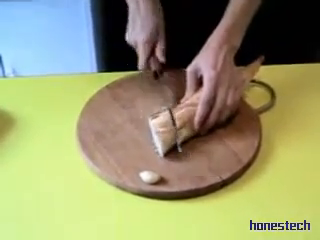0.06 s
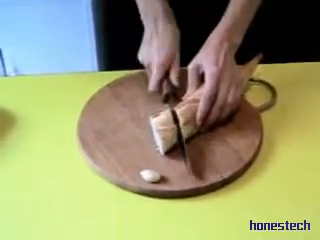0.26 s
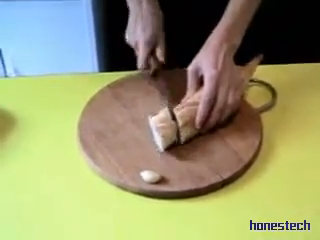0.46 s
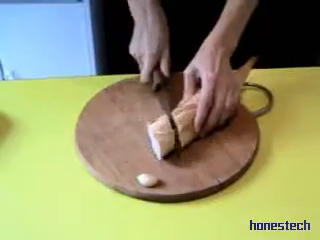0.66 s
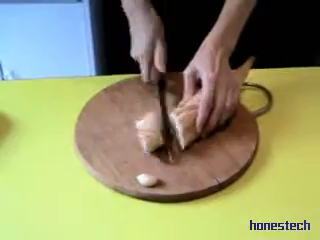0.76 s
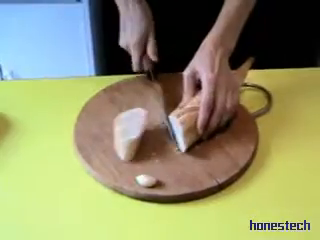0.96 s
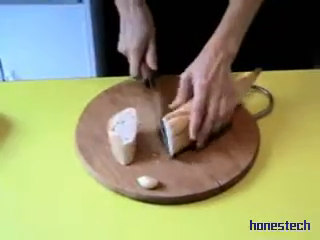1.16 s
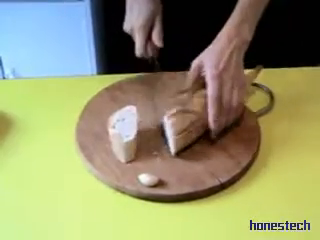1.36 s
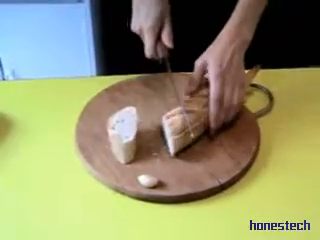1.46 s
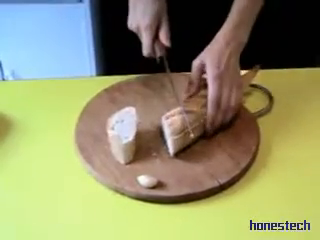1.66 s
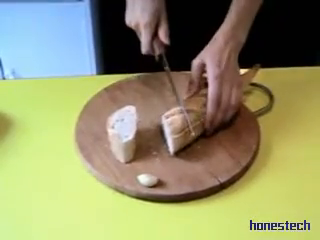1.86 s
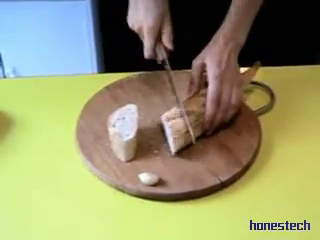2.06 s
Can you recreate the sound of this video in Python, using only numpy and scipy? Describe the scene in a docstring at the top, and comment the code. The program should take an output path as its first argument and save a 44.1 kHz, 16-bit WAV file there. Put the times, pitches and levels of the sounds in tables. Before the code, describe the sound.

Crunchy bread cutting in an echoing kitchen, a hard board knock, then a pause and light scraping

```python
"""In a bare, ringing kitchen, a knife saws through a crusty loaf on a round wooden board.
Streams of tiny clicks make the crunch of the strokes, and short bright bursts are single snaps of crust.
Low bursts thud under the hands; the blade breaks through and knocks on the wood, which rings as damped tones.
After a quieter pause with a thin squeak and light taps, the blade scrapes on the loaf and bites again.
Noise filtered to a low, steady murmur fills the room, and each contact gets its own random echo."""
import sys
import numpy as np
from scipy import signal
from scipy.fft import rfft, irfft, next_fast_len
from scipy.io import wavfile

SR = 44100
rng = np.random.default_rng(int(sys.argv[2]) if len(sys.argv) > 2 else 0)


def unload_audio(sound):
    """Save the sound as a 16-bit wav file, at the path given as the first command line argument."""
    columns = np.transpose(np.atleast_2d(sound))
    # keep every value between -1 and 1, then stretch to whole-number steps
    steps = np.round(np.clip(columns, -1, 1) * 32767)
    wavfile.write(sys.argv[1], SR, steps.astype(np.int16))


N = 92610  # length in samples, 2.1 s

TOP_HZ = 11200  # the sound has little above this
SNAP_DECAY_S = 0.014
CRUNCH_WET_DB = 1  # echo over direct sound for strokes, squeak and scrape
STROKE_RISE_S = 0.0027


def amp(db):
    """Turn decibels into an amplitude factor."""
    return 10 ** (np.asarray(db) / 20)


def unit(x):
    """Scale x to an average power of one."""
    return x / np.sqrt(np.mean(x ** 2) + 1e-20)


def along(points, hz):
    """Read a curve of (f/Hz, value) points, joined by lines on a log frequency axis."""
    f, v = np.transpose(points)
    return np.interp(np.log(hz + 1), np.log(f + 1), v)


def fade(t, t60):
    """Die away by 60 dB in t60 seconds."""
    return amp(-60 * t / np.maximum(t60, 1e-3))


def add(track, s, x):
    """Mix x into the track from time s, which may lie before the start."""
    i = round(s * SR)
    x, i = x[max(0, -i):], max(0, i)
    track[i:i + len(x)] += x[:max(0, N - i)]


def coloured(x, points, tilt_db=0):
    """Filter x to a colour curve; tilt_db per octave brightens or dulls it between 300 and 6000 Hz."""
    size = 8192
    hz = np.fft.rfftfreq(size, 1 / SR)
    tilt = tilt_db * np.log2(np.clip(hz, 300, 6000))
    top_cut = 60 * np.clip(hz / TOP_HZ - 1, 0, 1)
    gain = unit(amp(along(points, hz) + tilt - top_cut))
    # folding the cepstrum forward makes the filter answer at once, with no sound ahead of the hit
    cepstrum = irfft(np.log(gain + 1e-6))
    cepstrum[1:size // 2] *= 2
    cepstrum[size // 2 + 1:] = 0
    response = irfft(np.exp(rfft(cepstrum)))
    return signal.fftconvolve(x, response)[:len(x)]


def burst(decay_s):
    """A brief contact: fading noise of unit energy with a nearly even spectrum."""
    t = np.arange(4096) / SR
    x = rng.standard_normal(len(t))
    # evening out the spectrum smears the fade, so the two steps take turns
    for _ in range(3):
        even = irfft(np.exp(1j * np.angle(rfft(x))))
        x = even * fade(t, 2 * decay_s)
    return x / np.linalg.norm(x)


def ring(modes):
    """One second of damped tones from (f/Hz, level/dB, t60/s); each level sets the tone's energy."""
    t = np.arange(SR) / SR
    out = np.zeros(SR)
    for hz, db, t60 in modes:
        wave = np.sin(2 * np.pi * hz * t) * fade(t, t60)
        out += amp(db) * wave / np.linalg.norm(wave)
    return out


def kitchen(x, wet_db):
    """Direct sound, dense early reflections and a long, grainy tail, new for every sound."""
    # how long the echo lasts at each pitch: f/Hz, t60/s
    echo_times = [(120, 0.8), (300, 0.36), (600, 0.78), (1200, 0.74), (2500, 0.77), (5000, 0.75),
                  (11000, 0.73)]
    early_t60, early_db = 0.079, -4  # s; dB over the tail
    wall_delay_s = 0.0061  # the echo swells in over about this time
    clumps_per_s, clump_db = 220, 2.5  # reflections arrive in clumps
    t = np.arange(SR) / SR
    hz, s, bands = signal.stft(rng.standard_normal(SR), SR, nperseg=256)
    faded_bands = bands * fade(s, along(echo_times, hz)[:, None])
    tail = signal.istft(faded_bands, SR, nperseg=256)[1][:SR]
    early = rng.standard_normal(SR) * fade(t, early_t60)
    echo = unit(tail) + amp(early_db) * unit(early)
    knots = rng.standard_normal(size=1000)
    clumps = amp(clump_db * np.interp(t * clumps_per_s, np.arange(len(knots)), knots))
    echo = echo * clumps * (1 - np.exp(-(t / wall_delay_s) ** 2))
    direct = t == 0
    response = amp(wet_db) * echo / np.linalg.norm(echo) + direct
    return signal.fftconvolve(x, response / np.linalg.norm(response))[:SR]


def crumbs():
    """One second of tiny fractures at random times, mostly small and a few large."""
    per_s, spread_db = 600, 3.5
    hit = rng.random(SR) < per_s / SR
    sign = rng.choice([-1, 1], SR)
    size = amp(spread_db * np.minimum(rng.exponential(size=SR), 4))
    return unit(hit * sign * size)


def sawing():
    """Each stroke tears a stream of crumbs, with a quick start and a softer end."""
    # sawing strokes: start t/s, length/s, level before the common lift/dB, brightness/dB per octave
    strokes = [(-.1, 0.25, -44.5, 2), (.225, 0.05, -28.5, -1), (.38, 0.21, -43.5, -.5),
               (0.608, 0.032, -37, -1), (.66, 0.049, -57, -12), (1.0, 0.049, -41, 3),
               (1.14, 0.041, -42.5, 1.5), (1.23, 0.21, -53, 0), (1.94, 0.26, -65, 7),
               (2.065, 0.096, -41, 6.5)]
    # colour of the tearing crust: f/Hz, relative level/dB
    crunch_colour = [(60, -21), (200, -2), (500, 6.5), (1100, 4.5), (1600, 0.5), (2300, -3.5), (3000, -7),
                     (4500, -15.5), (5200, -33), (5800, -23), (8000, -33), (10800, -25.5)]
    lift_db, fall_s = 1.5, 0.042
    out, t = np.zeros(N), np.arange(SR) / SR
    rise = np.minimum(t / STROKE_RISE_S, 1)
    for s, length, db, tilt in strokes:
        push = rise * np.exp(-np.maximum(t - length, 0) / fall_s)
        crunch = kitchen(push * crumbs(), CRUNCH_WET_DB)
        add(out, s, amp(db + lift_db) * coloured(crunch, crunch_colour, tilt))
    return out


def air():
    """The low, steady noise of the room: random noise shaped by frequency."""
    # colour of the room noise: f/Hz, relative level/dB per Hz
    air_colour = [(25, -37), (60, -24), (90, -14.5), (116, -4), (136, -18), (162, 0), (200, -11.5),
                  (280, -6.5), (400, -9), (700, -15), (1000, -24), (2000, -33.5), (4000, -46), (7000, -56),
                  (11000, -55)]
    level_db = -46
    hz = np.fft.rfftfreq(N, 1 / SR)
    spectrum = rfft(rng.standard_normal(N)) * amp(along(air_colour, hz))
    return amp(level_db) * unit(irfft(spectrum, N))


def thuds():
    """The board bumps on the table under the hands, a soft burst that sets the room's low tones ringing."""
    # bumps: t/s, level before the common lift/dB
    bumps = [(.125, -15.5), (0.241, -10), (0.28, -10.5), (.482, -13.5), (0.5408, -5), (.581, -7),
             (.605, -11), (.791, -8.5), (0.831, -9), (1.01, -16.5), (1.06, -20), (1.15, -15),
             (1.478, -24.5), (1.811, -28)]
    # colour of a bump: f/Hz, relative level/dB
    bump_colour = [(30, -38), (60, -33.5), (110, -20), (160, 0), (300, -2), (450, -9), (800, -15),
                   (1500, -53), (4000, -51.5)]
    # ringing low tones of the room, before colouring: f/Hz, level/dB, t60/s
    room_modes = [(123.7, -21, 0.2), (162.1, -19.5, 0.48), (200.8, -31.5, .6), (285.5, -18, 0.54),
                  (383.6, -19, 0.39)]
    lift_db, decay_s, wet_db = 7.5, 0.032, 3
    out, room_ring = np.zeros(N), ring(room_modes)
    for s, db in bumps:
        bump = kitchen(burst(decay_s), wet_db) + room_ring
        add(out, s, amp(db + lift_db) * coloured(bump, bump_colour))
    return out


def crust():
    """Single flakes of crust break with a bright click, a very short burst of noise."""
    # snaps: t/s, level before the common lift/dB, brightness/dB per octave, echo over direct sound/dB
    snaps = [(.212, -20.5, -2, 11), (0.2163, -19.5, 1, 8), (0.2257, -22, 1.5, 2), (0.233, -16, -0.5, 1),
             (.236, -18, 2.5, 5), (.251, -15.5, -5.5, -6), (.280, -21.5, -1, -1), (0.592, -27, 0, -3),
             (.613, -20.5, -1, 4), (0.758, -26, -1.5, 4.5), (0.782, -12, -3, 11), (0.7892, -10, -2, 0),
             (1.144, -27, 0.5, 8.5), (1.535, -40, 0, 5), (1.975, -39, -5, -4), (2.033, -36, -5, 6),
             (2.063, -26.5, -5, -1)]
    # colour of breaking crust: f/Hz, relative level/dB
    crust_colour = [(60, -17.5), (300, 6), (900, 3), (2300, 6), (3100, 1.5), (4400, -2), (5200, -16.5),
                    (6000, -12), (8000, -19), (10800, -12.5)]
    lift_db = 17
    out = np.zeros(N)
    for s, db, tilt, wet_db in snaps:
        snap = kitchen(burst(SNAP_DECAY_S), wet_db)
        add(out, s, amp(db + lift_db) * coloured(snap, crust_colour, tilt))
    return out


def knocks():
    """Hard contacts on the board: a sharp burst that sets the wood ringing."""
    # contacts: t/s, level before the common lift/dB, brightness/dB per octave, echo over direct burst/dB
    contacts = [(.237, -12, -3.5, 10), (.279, -21, -1, 2), (0.7829, -8, 6, 5), (.7897, 2, 0, 5.5),
                (.809, -8.5, -2.5, 27), (0.829, -12, 0, 4), (.852, -11.5, 1.5, 14),
                (0.898, -15.5, -1.5, -6), (1.059, -23.5, -8.5, 15), (1.152, -23.5, -3.5, 3.5),
                (1.359, -33, -1, -16), (2.0625, -25.5, 6.5, 1)]
    # colour of the wood: f/Hz, relative level/dB
    wood_colour = [(30, -40), (70, -28), (130, -24), (200, -10.5), (270, 1), (500, -4), (850, -3),
                   (1400, -3.5), (1800, -15), (2450, -13), (3100, -38.5), (4500, -33), (5600, -47),
                   (11000, -39.5)]
    # ringing tones of the board, before colouring: f/Hz, level/dB, t60/s
    board_modes = [(236, -24.5, 0.52), (288.5, -15, 0.36), (421.8, -23, 0.66), (443.3, -20.5, 0.39),
                   (613, -20.5, 0.17), (627, -33, .5), (880, -22, .35), (893, -26.5, 0.28),
                   (1187, -29, 0.72), (1327, -36, .8), (1418, -30.5, 0.52)]
    lift_db, decay_s = 15.5, 0.03
    out, wood = np.zeros(N), ring(board_modes)
    for s, db, tilt, wet_db in contacts:
        knock = kitchen(burst(decay_s), wet_db) + wood
        add(out, s, amp(db + lift_db) * coloured(knock, wood_colour, tilt))
    return out


def squeak():
    """Steel brushes the crust: a short, thin scratch in a narrow band of noise."""
    start_s, centre_hz, level_db, decay_s = 1.387, 4340, -27.5, 0.076
    band = [(centre_hz / 2, -40), (centre_hz * 0.91, -22), (centre_hz, 0),
            (centre_hz * 1.12, -22), (centre_hz * 2, -40)]
    out = np.zeros(N)
    scratch = kitchen(burst(decay_s), CRUNCH_WET_DB)
    add(out, start_s, amp(level_db) * coloured(scratch, band))
    return out


def taps():
    """Light taps of the blade give only a short, hollow tock, with no ringing wood."""
    # taps: t/s, level/dB, brightness/dB per octave
    touches = [(1.5355, -13, -3), (1.9235, -13.5, -10), (2.063, -9.5, 4.5)]
    # colour of a tap: f/Hz, relative level/dB
    tap_colour = [(100, -20), (500, -12.5), (780, 8), (1050, -12), (1800, -15), (2400, -16), (4000, -22.5),
                  (11000, -42)]
    decay_s, wet_db = 0.02, -1
    out = np.zeros(N)
    for s, db, tilt in touches:
        tock = kitchen(burst(decay_s), wet_db)
        add(out, s, amp(db) * coloured(tock, tap_colour, tilt))
    return out


def scrape():
    """The teeth catch on the crust: a fading stream of crumbs, coloured to sound hollow."""
    # colour of the scrape: f/Hz, relative level/dB
    scrape_colour = [(200, -19), (800, -5), (1300, -0.5), (1750, 3.5), (2000, -2.5), (2400, -23.5),
                     (5000, -38), (10000, -27)]
    start_s, level_db, t60 = 1.94, -38, 0.43
    out, t = np.zeros(N), np.arange(SR) / SR
    rise = np.minimum(t / STROKE_RISE_S, 1)
    grains = rise * fade(t, t60) * crumbs()
    add(out, start_s, amp(level_db) * coloured(kitchen(grains, CRUNCH_WET_DB), scrape_colour))
    return out


def scene():
    """Mix nearly mono; a blurred copy of the snaps, opposite left and right, gives a trace of width."""
    # colour of the snaps' side sound: f/Hz, relative level/dB
    side_colour = [(200, -58), (700, -3.5), (1500, -11.5), (3000, -5.5), (5000, 9.5), (8000, -7)]
    side_db = -28.5
    snaps = crust()
    mid = sawing() + air() + thuds() + snaps + knocks() + squeak() + taps() + scrape()
    blurred = signal.fftconvolve(snaps, burst(SNAP_DECAY_S))[:N]
    side = amp(side_db) * coloured(blurred, side_colour)
    return np.array([mid + side, mid - side])


def record(dry):
    """Round off the highest peaks softly, then cut steeply above the band limit."""
    rounded = dry / (1 + np.abs(dry / .9) ** 6) ** (1 / 6)
    size = next_fast_len(N + SR // 2)
    hz = np.fft.rfftfreq(size, 1 / SR)
    low_pass = 1 / (1 + (hz / TOP_HZ) ** 160)
    return irfft(rfft(rounded, size) * low_pass, size)[:, :N]


dry = scene()
out = record(dry)
unload_audio(out)
```